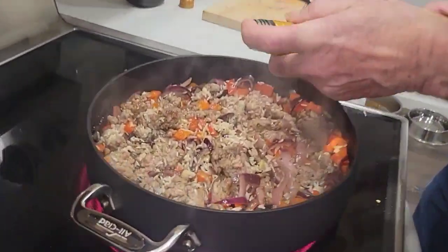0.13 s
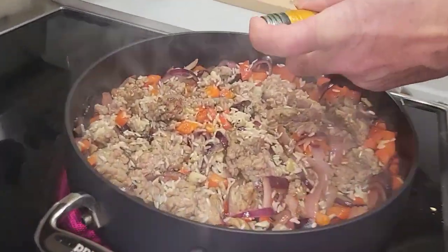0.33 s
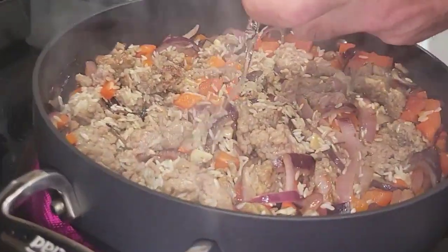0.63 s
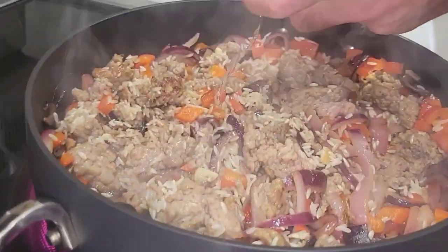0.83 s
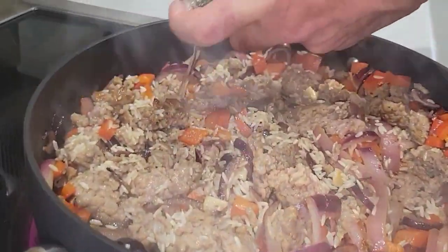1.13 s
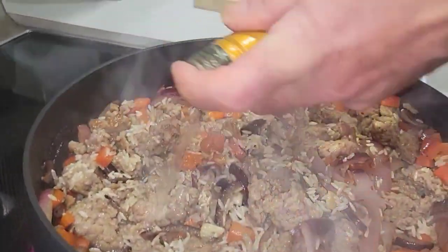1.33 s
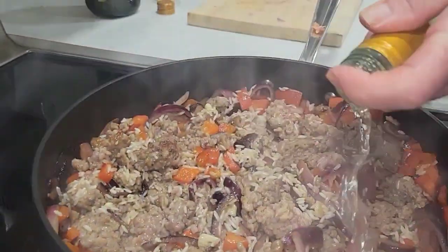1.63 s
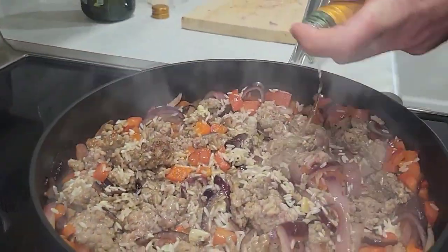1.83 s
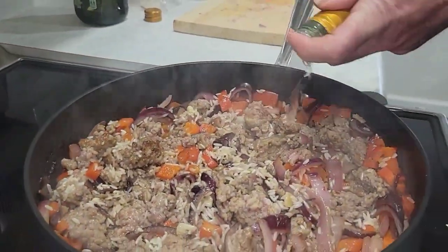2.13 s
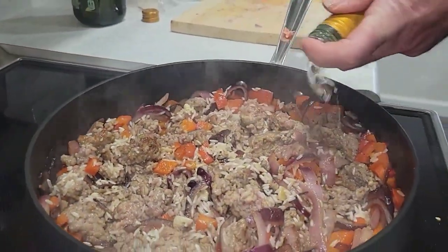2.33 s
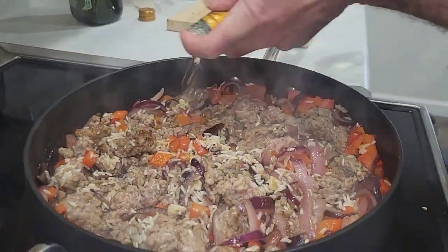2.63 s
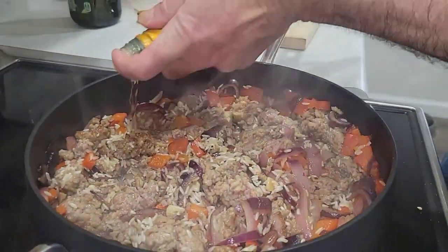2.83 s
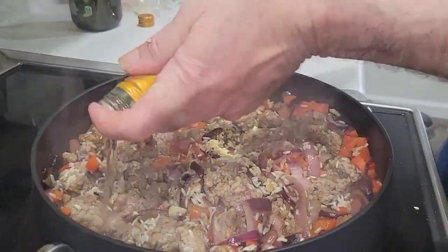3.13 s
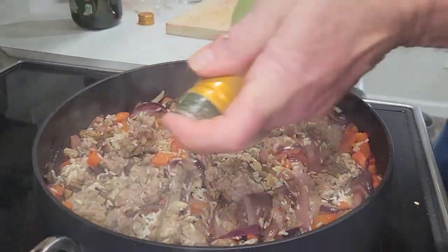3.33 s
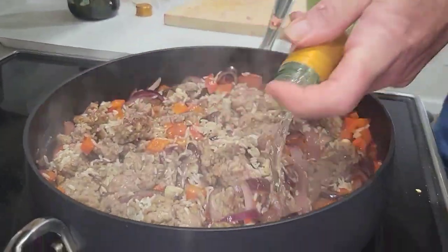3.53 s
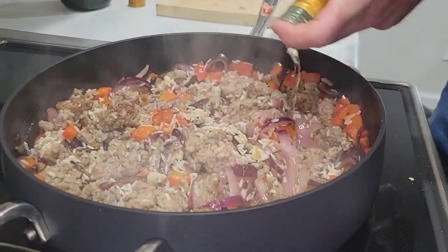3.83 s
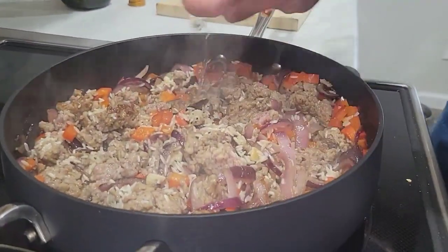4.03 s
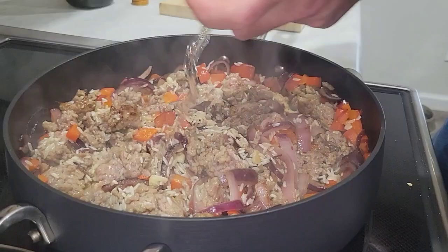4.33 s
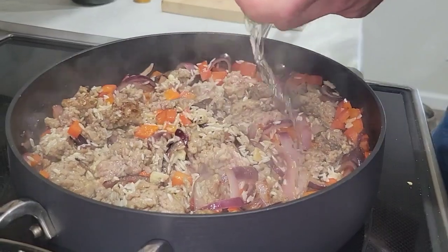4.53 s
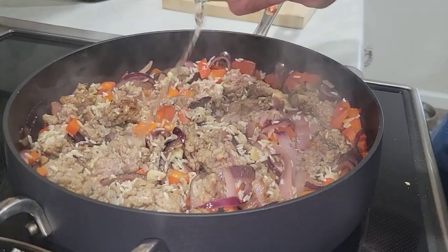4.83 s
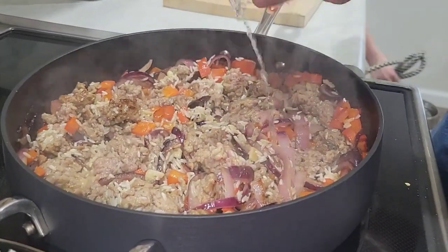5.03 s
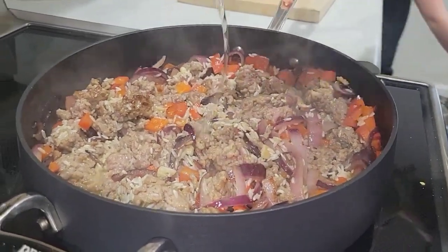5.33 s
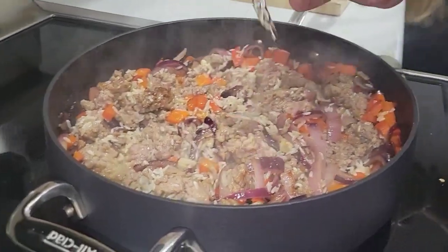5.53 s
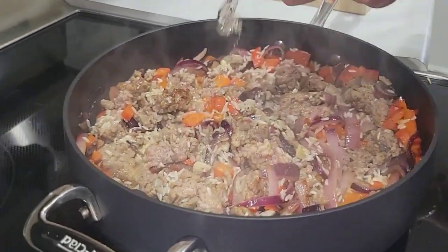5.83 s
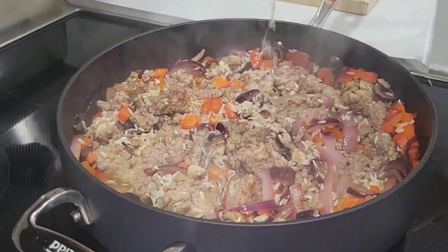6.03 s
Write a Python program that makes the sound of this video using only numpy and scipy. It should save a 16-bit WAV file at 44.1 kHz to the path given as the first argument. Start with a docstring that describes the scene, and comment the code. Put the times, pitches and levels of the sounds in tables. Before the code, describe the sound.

Wine is poured into a hot, deep skillet of food and boils with a dense sizzle and fine fizz. Fat spits in sharp ticks and single bubbles pop, while the bottle glugs softly now and then. The boil builds toward the middle, then eases a little as a lower gurgle grows. It is heard close up in a kitchen, over a faint appliance hum and slight handling rumble.

```python
"""Wine boils in a hot, deep skillet of food: large steam bubbles gurgle, small ones sizzle, spray fizzes.
The pan's hollow colours the boil differently at the left and right microphone ports. Fat spits, single
bubbles pop, two faint tones rise briefly within the sizzle, and the bottle glugs as it pours.
Underneath, two appliances hum, one switches off, and hands on the camera rumble and knock."""
import sys
import numpy as np
from scipy import signal
from scipy.fft import rfft, irfft, next_fast_len
from scipy.io import wavfile
from scipy.ndimage import uniform_filter1d, map_coordinates

SR = 44100
rng = np.random.default_rng(int(sys.argv[2]) if len(sys.argv) > 2 else 0)


def dump_mix(stems):
    """Bounce the given channels to the path in sys.argv[1] as a 16-bit WAV at rate SR."""
    frames = np.atleast_2d(stems).T  # one column per channel
    limited = np.clip(frames, -1, 1)  # hard clip at full scale
    pcm = np.round(limited * 32767).astype(np.int16)
    wavfile.write(sys.argv[1], SR, pcm)


N = 272185
TIME = np.arange(N) / SR
FFT_SIZE = next_fast_len(N + SR // 2)
FFT_HZ = np.fft.rfftfreq(FFT_SIZE, 1 / SR) + 1e-3


def amp(db):
    return 10 ** (np.asarray(db) / 20)


def unit_rms(x):
    return x / np.sqrt(np.mean(x ** 2) + 1e-20)


def lean_right(db):
    """Stereo gains: left down and right up by db."""
    return amp([[-db], [db]])


def wobble(per_s):
    """A smooth random curve with per_s knots a second."""
    coarse = np.arange(0, N + 64, 64)
    curve = map_coordinates(rng.standard_normal(int(N * per_s / SR) + 4), [coarse * per_s / SR])
    return np.interp(np.arange(N), coarse, curve)


def at_ports(pair, colour, low_hz, high_hz):
    """Two unrelated sounds become a band-limited left and right, shaped by a colour table; rms 1."""
    hz, *columns = np.transpose(colour)
    left_db, right_db, likeness, lead = (np.interp(np.log(FFT_HZ), np.log(hz), c) for c in columns)
    width = np.arccos(np.clip(likeness, 0, 1)) / 2
    mid, side = rfft(pair, FFT_SIZE) * [np.cos(width), np.sin(width)]
    band = 1 / np.sqrt((1 + (low_hz / FFT_HZ) ** 8) * (1 + (FFT_HZ / high_hz) ** 8))
    stereo = [amp(left_db) * (mid + side) * np.exp(1j * lead), amp(right_db) * (mid - side)]
    return unit_rms(irfft(band * stereo, FFT_SIZE)[:, :N])


def crackle(bed, per_s, spread_db, t60, clump_db):
    """A pair of noises: a bed roughened by clumps of short, uneven bursts; rms 1."""
    chance, draw = rng.random((2, N))
    size = -np.log(1 - draw).clip(-3, 0)
    hits = (chance < per_s / SR) * amp(spread_db * size + clump_db * wobble(17))
    power = signal.lfilter([1], [1, -amp(-120 / (t60 * SR))], hits ** 2)
    envelope = np.sqrt(bed + power) * amp(0.36 * clump_db * wobble(20))
    return unit_rms(envelope * rng.standard_normal((2, N)))


def patches(pair, frame, span, depth_db):
    """Random gain over patches of time and frequency: each spot boils at its own pitch and pace."""
    spectra = signal.stft(pair, nperseg=frame)[2]
    field = rng.standard_normal(spectra.shape[1:])
    field = uniform_filter1d(uniform_filter1d(field, span, 0), span, 1)
    return signal.istft(spectra * amp(depth_db * unit_rms(field)), nperseg=frame)[1][:, :N]


def ring_bubbles(rows, cycles, samples, scatter):
    """Bubbles ring, rise in pitch and lose 20 dB per `cycles`; scatter 0-1 dephases the two channels."""
    start, db, hz = np.transpose(rows)[:, :, None]
    age = np.arange(samples)
    turns = hz * age / SR
    envelope = amp(db - 20 * turns / cycles) * (1 - np.exp(-3 * turns))
    phase = 2 * np.pi * turns * (1 + 0.0084 * turns)
    slip = 2 * np.pi * scatter * rng.random((len(start), 1))
    positions = (np.round(start * SR).astype(int) + age).ravel()
    rings = [envelope * np.sin(phase - lag) for lag in (0, slip)]
    return np.array([np.bincount(positions, ring.ravel(), N)[:N] for ring in rings])


def swarm(per_s, hz, log_width, cycles, spread_db, samples):
    """Bubbles ring at chance moments, their pitches spread around hz; rms 1."""
    count = int(per_s * N / SR)
    when, draw = rng.random((count, 2)).T
    pitch = hz * np.exp(log_width * rng.standard_normal(count))
    level_db = -spread_db * np.log(1 - draw).clip(-4, 0)
    rows = np.transpose([when * (N - 1) / SR, level_db, pitch])
    return unit_rms(ring_bubbles(rows, cycles, samples, scatter=1))


def walls(dry):
    """The pan's wall and the tiles smear each burst into a short tail."""
    t, t60 = np.arange(2000) / SR, 0.079
    tail = rng.standard_normal((2, len(t))) * amp(-60 * t / t60)
    return dry + amp(-2) * signal.fftconvolve(dry, tail / np.linalg.norm(tail[0]), axes=1)[:, :N]


# Appliance hums. Each row: pitch in Hz, level in dB, switch-off time in seconds.
HUM_TONES = [(46.7, -65, 9), (117.4, -62, 1.64)]
def appliances():
    """Two low hums waver; the higher one switches off early, the lower runs throughout."""
    out = np.zeros(N)
    for hz, db, off in HUM_TONES:
        envelope = amp(db + 0.64 * wobble(3.4)) * np.clip((off - TIME) / 0.05, 0, 1)
        out += np.sqrt(2) * envelope * np.sin(2 * np.pi * hz * TIME)
    return out * lean_right(0.8)


# The rumble's colour. Each row: frequency in Hz, left and right gain in dB, likeness of the sides
# from 0 to 1, left phase lead in radians.
RUMBLE_COLOUR = [(15, -10, -2, .7, 0), (35, -17, -2, 0.71, 0), (71, 3.5, 4, 0.77, 0), (118, 2, 1, 0.99, 0),
                 (201, -8.5, -3, 0.55, 0), (300, -17, -20, .9, 0)]
# Shifts of the grip. Each row: crest time in seconds, level in dB.
GRIP_SHIFTS = [(.46, -48), (.56, -50), (1.71, -51), (2.11, -49), (2.82, -52), (4.33, -49), (5.37, -51),
               (5.56, -59), (5.89, -51)]
def rumble():
    """A low room rumble creeps up, and swells whenever the grip shifts on the camera."""
    rise_s, t60 = 0.01, 0.19
    level = amp(-62.5 + 0.83 * TIME)
    for crest, db in GRIP_SHIFTS:
        attack = np.exp(np.minimum(TIME - crest, 0) / rise_s)
        level += attack * amp(db - 60 * np.maximum(TIME - crest, 0) / t60)
    return level * at_ports(rng.standard_normal((2, N)), RUMBLE_COLOUR, low_hz=9.2, high_hz=400)


# Soft knocks. Each row: centre in seconds, level in dB, pitch in Hz, half-width in seconds.
BODY_KNOCKS = [(0.901, -52, 42, .035), (5.858, -40, 38, .025), (5.892, -39, 48, .02),
               (5.927, -51, 66, 0.016)]
def knocks():
    """Hands bump the camera body, each bump a rounded pulse of bass."""
    out = np.zeros(N)
    for centre, db, hz, half_width in BODY_KNOCKS:
        t = TIME - centre
        out += amp(db) * np.exp(-(t / half_width) ** 2) * np.cos(2 * np.pi * hz * t)
    return out * lean_right(0.8)


# Air gulps into the bottle neck. Each row: start in seconds, level in dB, pitch in Hz.
AIR_GULPS = [(0.461, -38.5, 304), (0.911, -41, 297), (1.259, -35, 298), (1.586, -35, 279),
             (2.578, -42, 286), (3.339, -35.5, 338), (4.328, -37, 317), (5.054, -36.5, 296),
             (5.869, -34, 320)]
def bottle_glugs():
    """The air in the bottle rings on its lowest tone and near twice that."""
    out, t = np.zeros(N + SR), np.arange(SR // 8) / SR
    attack_s, t60 = 0.0016, 0.09
    for start, db, hz in AIR_GULPS:
        tone = np.sin(2 * np.pi * hz * t) + amp(2) * np.sin(2 * np.pi * 1.9 * hz * t)
        envelope = amp(db - 60 * t / t60) * (1 - np.exp(-t / attack_s))
        out[round(start * SR):][:len(t)] += envelope * tone
    return out[:N] * lean_right(1.1)


# Faint tones. Each row: start in seconds, length in seconds, pitch in Hz, level in dB.
FAINT_TONES = [(3.71, 0.07, 2150, -37), (3.829, 0.139, 1013, -36.5)]
def faint_tones():
    """Brief, fluttering tones within the sizzle: each swells, rises a little and fades."""
    out = np.zeros(N + SR)
    rise, flutter_hz, rough_db = 0.043, 74, 4
    for start, length, hz, db in FAINT_TONES:
        progress = np.arange(round(length * SR)) / (length * SR)
        knots = rng.standard_normal((2, 16))
        flutter, rough = (np.interp(progress, np.linspace(0, 1, 16), k) for k in knots)
        pitch = hz * (1 + rise * progress) + flutter_hz * flutter
        tone = np.sqrt(2) * np.sin(2 * np.pi * np.cumsum(pitch) / SR)
        envelope = amp(db + rough_db * rough) * np.sqrt(np.sin(np.pi * progress))
        out[round(start * SR):][:len(tone)] += envelope * tone
    return out[:N] * lean_right(2.5)


# Spits of fat. Each row: start in seconds, level in dB, band centre in Hz.
FAT_SPITS = [(0.0615, -13, 12770), (0.1481, -16, 12500), (0.2379, -13, 8780), (0.406, -10, 11800),
             (0.4234, -14, 6670), (0.5462, -21, 8830), (0.573, -13, 8500), (0.586, -20, 8500),
             (0.598, -14, 8500), (0.6584, -17, 8700), (0.6923, -23, 8790), (1.1697, -14, 6150),
             (1.275, -17, 4500), (1.358, -8, 10000), (1.5818, -15, 13500), (1.59, -13, 14000),
             (1.6, -14, 14000), (1.7105, -15, 6000), (1.7614, -15, 13000), (1.8901, -9.5, 5450),
             (2.3331, -11, 7660), (2.3795, -4, 13700), (2.495, -9, 13900), (3.3478, -13, 8520),
             (4.1495, -12, 9880), (4.3919, -13, 6380), (4.5246, -16.5, 6620), (4.8244, -13, 6820)]
def fat_spits():
    """Hot fat spits in short, bright cracks of noise, unrelated at the two ports."""
    out, t = np.zeros((2, N + SR)), np.arange(400) / SR
    hz = np.fft.rfftfreq(len(t), 1 / SR) + 1
    attack_s, t60 = 0.00046, 0.0054
    for start, db, centre_hz in FAT_SPITS:
        band = np.exp(-(np.log(hz / centre_hz) / 0.63) ** 2)
        hiss = unit_rms(irfft(rfft(rng.standard_normal((2, len(t)))) * band))
        envelope = amp(db - 60 * t / t60) * (1 - np.exp(-t / attack_s))
        out[:, round(start * SR):][:, :len(t)] += envelope * hiss
    return out[:, :N] * lean_right(1.1)


# Pops that stand out of the boil. Each row: start in seconds, level in dB, pitch in Hz.
BUBBLE_POPS = [(0.3988, -13, 2540), (0.407, -11.5, 2180), (0.904, -27, 525), (0.9782, -8.5, 3020),
               (1.0173, -14, 2610), (1.2745, -18, 2440), (1.359, -14, 2400), (1.408, -16.5, 1740),
               (1.437, -16, 4000), (1.582, -12.5, 2600), (1.586, -12, 1970), (2.1086, -12, 2450),
               (2.579, -20, 1050), (2.833, -10, 1800), (3.28, -15, 1950), (3.355, -20.5, 980),
               (4.347, -22, 800), (4.552, -16.5, 743), (5.062, -16, 684), (5.068, -20, 1000),
               (5.433, -21, 864), (5.696, -18, 794), (5.934, -22, 2000), (6.032, -16.5, 845)]
def bubble_pops():
    """Single bubbles burst, each with a quick upward blip."""
    return ring_bubbles(BUBBLE_POPS, cycles=4.2, samples=600, scatter=0.12) * lean_right(1.2)


# The pan's colour on the spray. Each row: frequency in Hz, left and right gain in dB, likeness
# from 0 to 1, left phase lead in radians.
SPRAY_COLOUR = [(3240, 4, 1.5, 0.04, 3), (4140, -11, -7, 0.8, 2), (5140, -12, -19, 0.1, 4),
                (6360, -11, -9.5, 0.01, 3.5), (7150, -13.5, -10, 0.07, 3), (8820, -12, -9.5, .03, -0.5),
                (9800, -15, -12, 0, 0), (11200, -17, -17, 0, 0), (12500, -14.5, -12.5, .02, 0.5),
                (14500, -14.5, -13, .05, 4.5), (15700, -14.5, -13, .05, -1)]
def spray(bed):
    """Fine spray fizzes, sinks against the bubbles until the pan floor is wetted, then regains a little."""
    wetted_s = 3.45
    db = 2 - 0.97 * np.minimum(TIME, wetted_s) + 0.67 * np.maximum(TIME - wetted_s, 0)
    fizz = crackle(bed, per_s=300, spread_db=3.2, t60=0.0054, clump_db=0.33)
    fizz = patches(fizz, frame=64, span=4, depth_db=1)
    fizz = patches(fizz, frame=1024, span=3, depth_db=1.93)
    return amp(db) * at_ports(fizz, SPRAY_COLOUR, low_hz=4530, high_hz=23600)


# The pan's hollow on the large bubbles. Each row reads as in SPRAY_COLOUR.
GURGLE_COLOUR = [(169, -23, -27, 0.94, 0), (242, -19.5, -15.5, 1, 0), (320, -12.5, -11.5, 0.89, -0.85),
                 (442, -18, -16, 0.1, 0.6), (516, -4.5, -7, 1, 1), (548, -7, -2.5, 1, 0.55),
                 (642, -2, -11, 0.8, -0.02), (741, -3, 0.5, 0.18, 1.1), (912, -9, -2.5, 0, -3),
                 (993, -13, 2, 0.23, 1), (1190, 1, 0.3, 0.35, 4), (1300, -25, -1, 0.67, 2),
                 (1405, -7, -11.5, 0.65, 3), (1650, 1.5, 7, 0.29, 2.2)]
def large_bubbles(bed):
    """Large steam bubbles gurgle, gaining on the small ones while the wine pools in the pan."""
    pool_s, full_s = 2.24, 5.26
    db = -8 + 3 * (np.clip(TIME, pool_s, full_s) - pool_s)
    gurgle = crackle(bed, per_s=90, spread_db=1.2, t60=0.015, clump_db=0.13)
    gurgle = patches(gurgle, frame=2048, span=3, depth_db=1.6)
    rings = swarm(per_s=200, hz=720, log_width=0.454, cycles=4.7, spread_db=0.67, samples=400)
    return amp(db) * at_ports(gurgle + amp(-18) * rings, GURGLE_COLOUR, low_hz=215, high_hz=1513)


# The pan's hollow on the small bubbles. Each row reads as in SPRAY_COLOUR.
SIZZLE_COLOUR = [(1090, -1, 0.5, 0.57, 2), (1270, -3.5, -3.5, 0.15, 2.3), (1440, -3, -1, 0.65, 2.26),
                 (1556, -5.5, -2.5, 0.05, 3.6), (1710, -1, -2.1, 0.8, 1.6), (1920, -6.5, 0.9, 0.13, 1.92),
                 (2200, 0, 0.5, 0.5, 2.24), (2480, -1, 1.5, 0.46, 1.67), (2740, -13, 3.8, 0.37, 3.5),
                 (2940, 1.5, -1.7, 0.52, 1.53), (3260, -8, -5, 0.12, 4.4), (3730, -9.5, -7.5, 0.2, 1.36),
                 (4640, -8, -16.5, 0.3, 0.5), (4630, -10.5, -7, 0.04, 3.2)]
def small_bubbles(bed):
    """Small steam bubbles sizzle and ring, and droplets crack on the bare metal."""
    sizzle = crackle(bed, per_s=140, spread_db=1.8, t60=0.0035, clump_db=0.94)
    sizzle = patches(sizzle, frame=2048, span=2, depth_db=3.5)
    rings = swarm(per_s=300, hz=2112, log_width=0.352, cycles=10.5, spread_db=1.9, samples=300)
    droplets = swarm(per_s=110, hz=2820, log_width=0.35, cycles=1, spread_db=1.7, samples=80)
    mix = sizzle + amp(-18.5) * rings + amp(-16.5) * droplets
    return at_ports(mix, SIZZLE_COLOUR, low_hz=1285, high_hz=4780)


# The vigour of the boil, one fader for bubbles and spray. Each row: time in seconds, level in dB.
BOIL_VIGOUR = [(0.0, -33), (0.45, -31.5), (1.27, -29), (1.61, -28.5), (1.76, -26.5), (1.85, -27),
               (1.95, -26), (2.84, -25.5), (3.6, -26.5), (4.42, -27.5), (5.0, -29), (5.75, -29.5),
               (6.17, -30.5)]
def boiling_wine():
    """Wine boils on the hot pan: gurgle, sizzle and fizz build up together, then ease off."""
    vigour_db = np.interp(TIME, *np.transpose(BOIL_VIGOUR))
    bed = amp(0.88 * (vigour_db - vigour_db.min()))  # a fuller boil drowns the single bursts
    boil = large_bubbles(bed) + small_bubbles(bed) + spray(bed)
    surge_db = 0.11 * wobble(9) + 0.46 * wobble(30)  # the whole pan flares together
    return amp(vigour_db + surge_db) * boil


def scene():
    """The skillet and the bottle over the low sounds of the kitchen."""
    skillet = walls(bubble_pops() + fat_spits()) + boiling_wine() + faint_tones()
    return skillet + bottle_glugs() + appliances() + knocks() + rumble()


def record(dry):
    """The camera keeps nothing above its band limit."""
    top_hz = 15750
    return irfft(rfft(dry, FFT_SIZE) * (FFT_HZ < top_hz), FFT_SIZE)[:, :N]


dry = scene()
out = record(dry)
dump_mix(out)
```